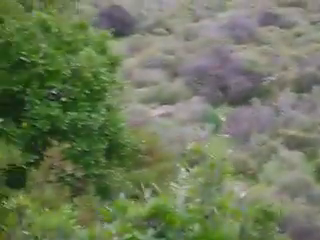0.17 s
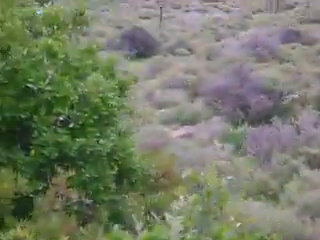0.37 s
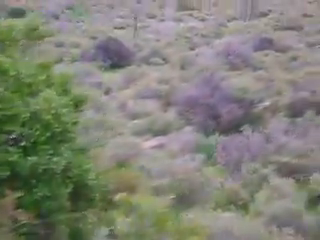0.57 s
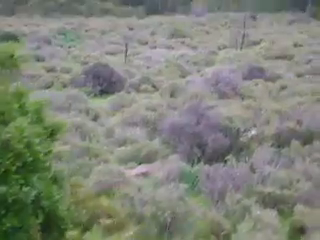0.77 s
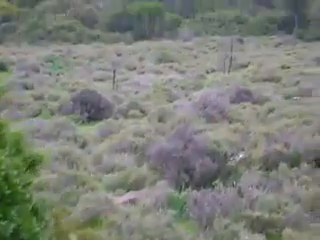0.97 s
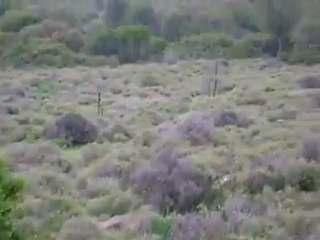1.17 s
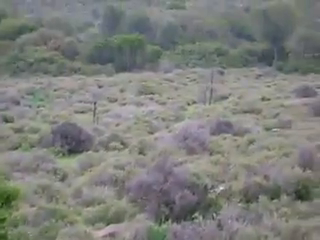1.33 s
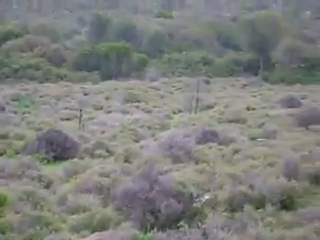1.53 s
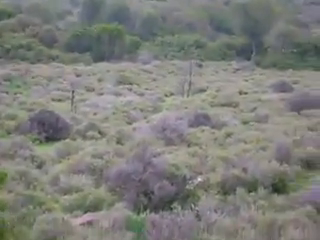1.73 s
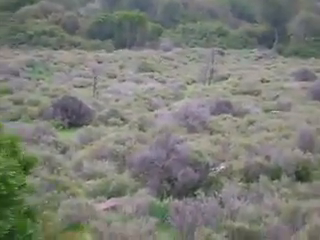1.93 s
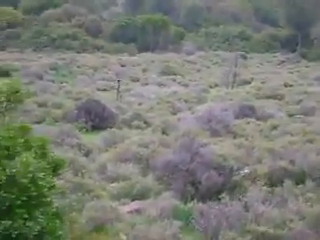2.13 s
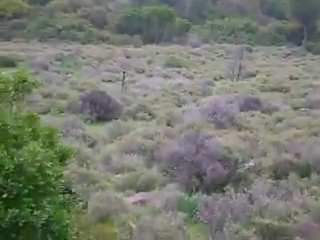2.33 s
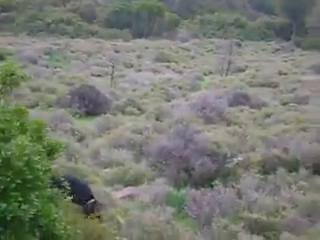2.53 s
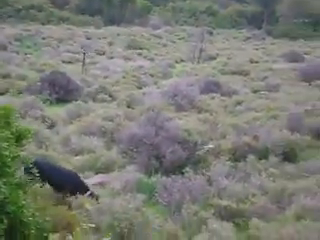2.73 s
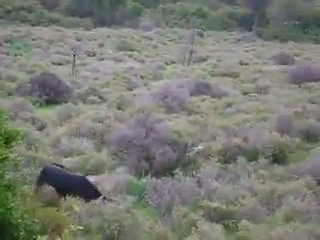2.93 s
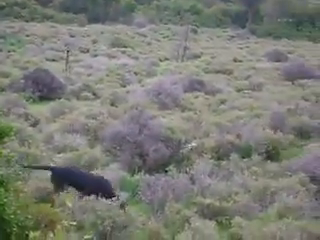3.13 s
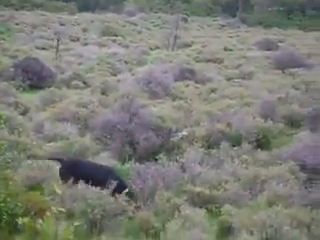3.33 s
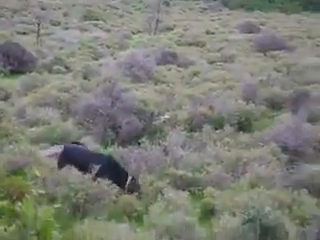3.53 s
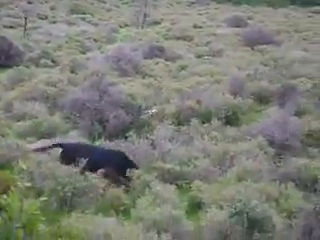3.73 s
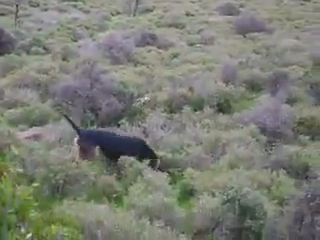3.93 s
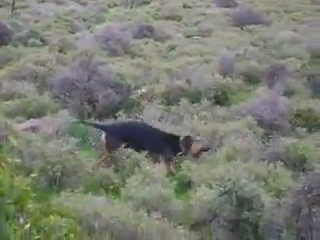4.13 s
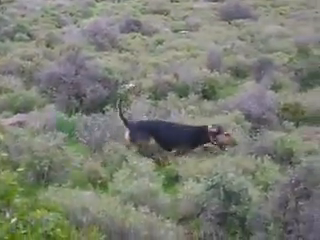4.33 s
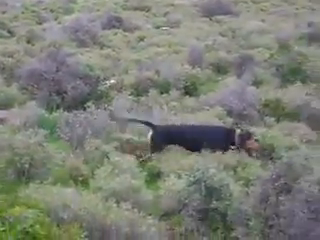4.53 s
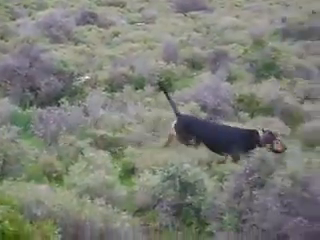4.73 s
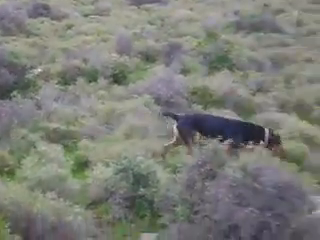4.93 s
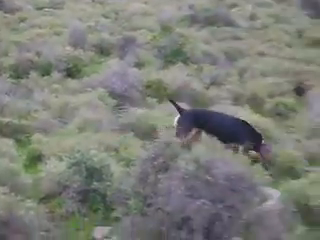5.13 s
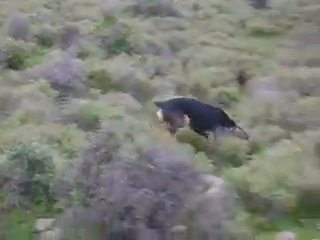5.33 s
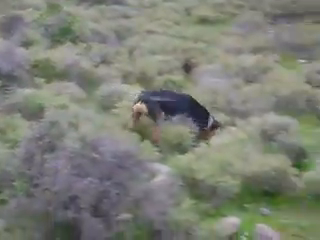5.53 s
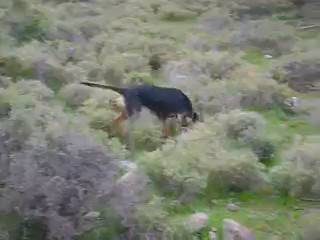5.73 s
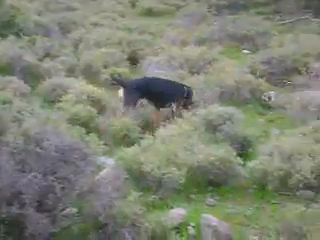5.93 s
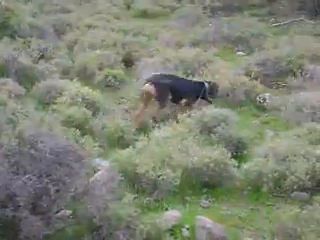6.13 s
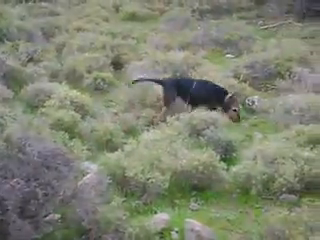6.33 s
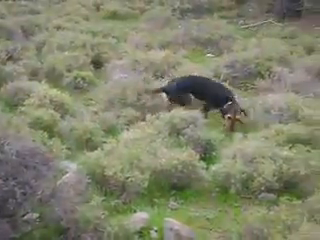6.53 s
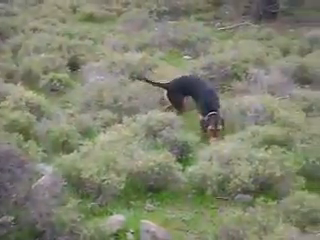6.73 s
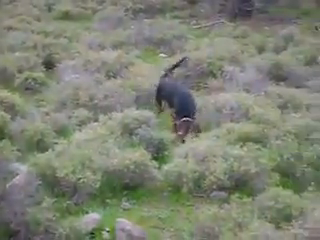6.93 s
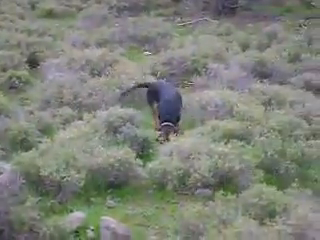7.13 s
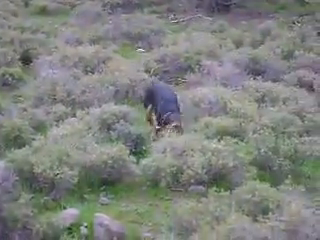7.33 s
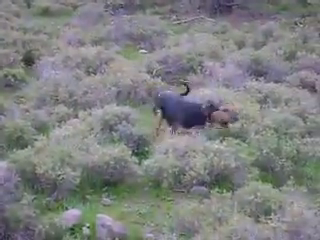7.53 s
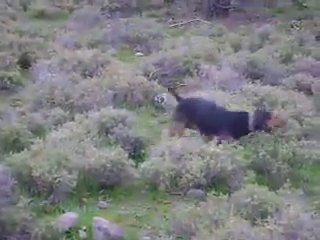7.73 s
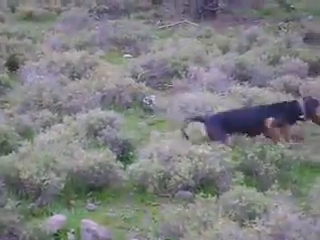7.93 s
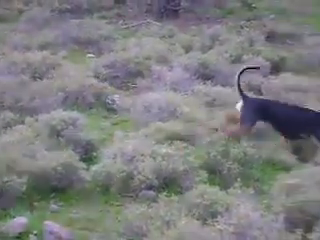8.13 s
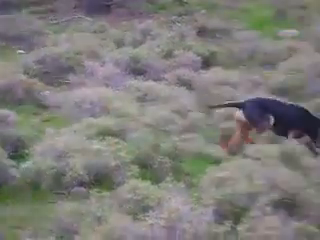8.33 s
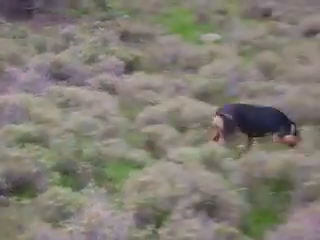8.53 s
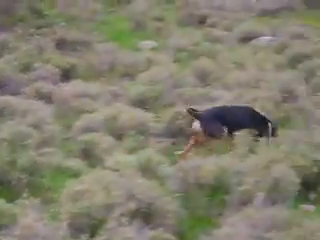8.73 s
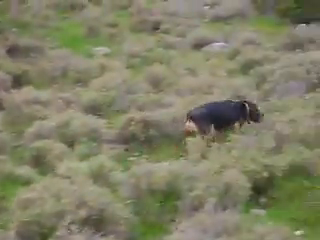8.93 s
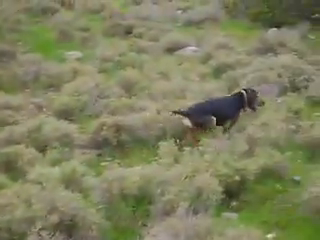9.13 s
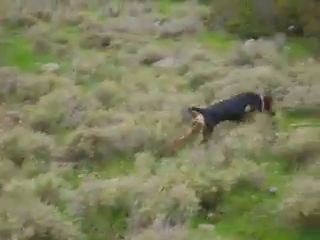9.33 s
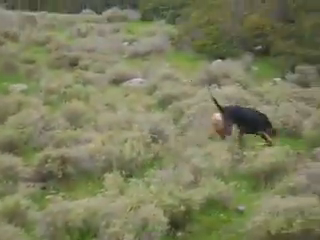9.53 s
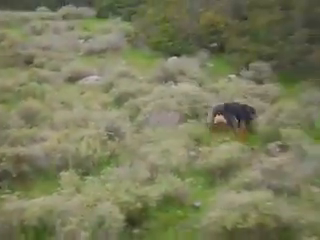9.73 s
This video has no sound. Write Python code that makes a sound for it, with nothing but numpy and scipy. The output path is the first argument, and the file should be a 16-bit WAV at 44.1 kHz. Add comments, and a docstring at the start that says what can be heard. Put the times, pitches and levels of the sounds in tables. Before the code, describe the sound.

Clipped yelping barks echo faintly over an open slope, between pauses filled with collar-bell clinks, rustling scrub, snapping twigs and soft hiss.

```python
"""Hound on a scrubby hillside

Ten short barks overload the microphone input, with soft grunts between: harmonics and rasp through a throat.
A small collar bell clanks in ringing modes, twigs snap as damped bursts, brush rustles as grainy noise.
The calls leave a hollow ring and a faint slope echo; gusts rumble in low noise over an outdoor hiss.
"""
import sys
import numpy as np
from scipy import signal
from scipy.fft import rfft, irfft
from scipy.io import wavfile

SR = 44100
rng = np.random.default_rng(int(sys.argv[2]) if len(sys.argv) > 2 else 0)


def persist_wave(psi):
    """Save psi, clipped to +-1, as 16-bit WAV."""
    counts = np.round(np.clip(psi, -1, 1) * 32767).astype(np.int16)
    wavfile.write(sys.argv[1], SR, np.atleast_2d(counts).T)


N = 431718  # samples


def amp(db):
    """Decibels to gain."""
    return 10 ** (np.asarray(db) / 20)


def unit(x):
    """Scales to rms 1."""
    return x / np.sqrt(np.mean(x ** 2) + 1e-20)


def read(points, hz):
    """Reads a (Hz, value) curve on a log-frequency axis."""
    f, value = np.transpose(points)
    return np.interp(np.log(hz + 1), np.log(f + 1), value)


def add(mix, s, sound):
    """Adds a sound into the mix at time s."""
    part = mix[max(round(s * SR), 0):][:len(sound)]
    part += sound[:len(part)]


def colour(x, db_at):
    """Filters x by a gain in dB given as a function of frequency."""
    hz = np.fft.rfftfreq(len(x), 1 / SR)
    return irfft(rfft(x) * amp(db_at(hz)), len(x))


def noise(size, db_at):
    """Coloured noise of rms 1."""
    return unit(colour(rng.standard_normal(N)[:size], db_at))


def waver(size, hz):
    """Smooth random drift of rms 1, rolled off steeply above hz."""
    return noise(size, lambda f: -20 * np.log10(1 + (f / hz) ** 4))


def hound(turbulence_db=-17.0):
    """All the barks and grunts; forced air roughens the barks, the soft grunts are duller."""
    # barks: start_s, (attack_s, to_voice_break_s, to_crest_s, length_s),
    # (pitch_hz in the chest voice, after the break, held, at the crest, at the end),
    # bend of the final fall (1 = straight, more = late), (effort_db held, at the end),
    # (mouth_opening_db at the break, held, at the crest), roughness (0-1)
    barks = [ (.624, (0.028, 0.0044, 0.059, 0.1), (324.8, 600.7, 723.4, 800, 613), 1.62, (4.1, -2.9),
             (6.2, 1, 5), 0.16), (.986, (.017, .017, .094, .117), (438.2, 708.6, 661.4, 699.4, 631),
             2.4, (9.3, -2.5), (2.2, 0.94, 0), 0.36), (4.193, (.021, 0.018, .081, 0.11),
             (440, 699.5, 674, 783.3, 592), 1.1, (10, 4.9), (16.1, -11.5, 20), 0.34),
             (4.718, (.013, .021, .081, .115), (514.7, 744, 679, 777.5, 609.3), 0.62, (6.2, 1),
             (18, 0.62, 15), 0.63), (6.245, (.013, .019, .086, .109), (483.2, 724.6, 683, 724, 614.5),
             1.56, (8.4, 1.5), (9.4, -0.5, -3.5), 0.23), (7.507, (.01, .013, .078, .112),
             (440.3, 675.3, 653.4, 765.3, 601), 1.76, (12.4, 0), (13.6, -2, 40), 0.46),
             (7.877, (.014, .012, .078, .113), (408, 633.3, 670, 687.6, 489.5), 2.13, (11.2, 0.9),
             (25, 27, 20.3), 0.55), (8.234, (.012, .014, .081, .116), (407.5, 662.7, 726.7, 763, 646.5),
             1.18, (10.3, 0), (3.2, -4, 13.6), 0.32), (8.945, (.008, .012, .082, .116),
             (428.4, 700.4, 656.6, 792.4, 585), 2.194, (6.2, 2), (4, -7, 15), 0.47),
             (9.348, (.027, 0.0028, .055, .098), (487, 540, 651, 706.4, 572.2), 0.379, (3.7, 6.4),
             (32, 25, 6.8), 0.3)]
    # grunts and whines: peak_s, rise_s, fall_s, pitch_hz, effort_db, mouth_opening_db,
    # roughness (held within 0-1)
    grunts = [(3.958, 0.037, 0.05, 692, -41, -15, 0.3), (4.547, 0.019, 0.019, 405.5, -10, 16, 0),
              (5.982, 0.012, 0.043, 318.5, -25.5, -8.5, 1.07), (6.382, 0.013, .016, 639, -5, -1, 0.2),
              (7.366, 0.01, 0.015, 337.3, -9.5, -1, 0.31), (8.82, 0.017, 0.015, 300.4, -20, -10, 0.6),
              (9.096, 0.0093, 0.013, 667, -7.5, -9, 0)]
    # turbulence at the vocal folds: frequency_hz, relative_level_db
    turbulence = [(300, -16.5), (700, 1.5), (1200, 21), (2000, 6), (2800, -10), (4200, -42.5), (6000, -35)]
    out = np.zeros(N)
    for s, *shape in barks:
        lead, call = voice(*bark_gesture(*shape), fundamental_db=-3., jitter=0.037,
                           half_lines=0.42, rasp=.55, shimmer=0.77)
        # the flow turns turbulent at each opening of the folds
        rush = noise(len(call), lambda f: read(turbulence, f)) * abs(call)
        add(out, s + lead, call + amp(turbulence_db) * rush)
    for s, *shape in grunts:
        lead, call = voice(*grunt_gesture(*shape), fundamental_db=21.5, jitter=0.04,
                           half_lines=0.17, rasp=0.6, shimmer=1.0)
        dull_call = colour(call, lambda f: read([(1100, -1), (1900, -15.5), (4000, -4.0)], f))
        add(out, s + lead, dull_call)
    return out


def bark_gesture(times, pitches, bend, efforts, mouths, rough):
    """A bark climbs in the chest voice, breaks upward, holds, rises to a crest and falls away."""
    break_s, crest_rise_s, release_s = 0.00487, 0.0201, .016
    onset_pitch, release_pitch = .68, .9  # pitch ratios
    chest_climb_per_s = 5.964  # relative climb
    onset_db, chest_db, release_db = -44, -0.5, -37  # effort outside the high register
    break_effort_db, crest_effort_db = -1, -3.5  # relative to the held effort
    # opening, as dB on the upper throat resonance
    mouth_onset_db, mouth_chest_db, mouth_end_db = 19, -16.5, -7
    rough_onset, rough_chest, rough_end = 0.53, 0.031, 0.57
    rough_held, rough_crest = 1, 1.46  # times the roughness of the bark
    mouth_sag = 0.085  # share by which that resonance sinks as the jaw closes after the crest

    attack, to_break, to_crest, length = times
    chest_hz, break_hz, held_hz, crest_hz, end_hz = pitches
    db, end_db = efforts
    mouth_break, mouth_held, mouth_crest = mouths
    start_hz = chest_hz * np.exp(-chest_climb_per_s * to_break)
    stages = [  # time_s, pitch_hz, effort_db, mouth_opening_db, roughness
        (-attack, start_hz * onset_pitch, onset_db, mouth_onset_db, rough_onset),
        (0, start_hz, chest_db, mouth_chest_db, rough_chest),
        (to_break, chest_hz, chest_db, mouth_chest_db, rough_chest),
        (to_break + break_s, break_hz, db + break_effort_db, mouth_break, rough),
        (to_crest - crest_rise_s, held_hz, db, mouth_held, rough * rough_held),
        (to_crest, crest_hz, db + crest_effort_db, mouth_crest, rough * rough_crest),
        (length, end_hz, end_db, max(mouth_end_db, mouth_held / 2), rough_end),
        (length + release_s, end_hz * release_pitch, release_db, mouth_end_db, rough_end)]
    s, *columns = np.transpose(stages)
    t = np.arange(s[0], s[-1], 1 / SR)
    hz, effort_db, mouth_db, roughness = (np.interp(t, s, c) for c in columns)
    fall = np.clip((t - to_crest) / (length - to_crest), 0, 1)
    bent_hz = hz + (crest_hz - end_hz) * (fall - fall ** bend)
    return t, bent_hz, effort_db, mouth_db, roughness, mouth_sag * np.sqrt(fall)


def grunt_gesture(rise, fall, hz, db, mouth_db, rough):
    """A grunt is one small arch of pitch and effort."""
    fade_db, arch = -23, 0.091  # level change and share of pitch lost at either end
    t = np.arange(-rise, fall, 1 / SR)
    away = np.maximum(-t / rise, t / fall)  # 0 at the peak, 1 at either end
    return t, hz * (1 - arch * away ** 2), db + fade_db * away ** 1.16, mouth_db, rough, 0


def mouth_shape(hz):
    """The upper throat resonance, 1 at its centre."""
    centre_hz, spread_hz = 1424, 214
    return np.exp(-.5 * ((hz - centre_hz) / spread_hz) ** 2)


def voice(t, hz, effort_db, mouth_db, rough, sag, fundamental_db, jitter, half_lines, rasp, shimmer):
    """One call from its pitch, effort and mouth opening; rough folds add half lines, jitter and rasp."""
    # throat response: frequency_hz, relative_level_db
    throat = [(150, -53), (420, -22.5), (570, -3), (720, 9), (880, -3.5), (1100, -1), (1400, -9.5),
              (1800, -14), (2400, -33.5), (3200, -45), (4200, -18), (6000, -88)]
    rough, size = np.clip(rough, 0, 1), len(t)
    turns = np.cumsum(hz * (1 + jitter * rough * waver(size, 194))) / SR
    folds, power = np.zeros(size), np.zeros(size)
    for half in range(1, 25):  # in steps of half the pitch
        f = hz * half / 2
        mouth_gain_db = mouth_db * mouth_shape(f / (1 - sag))
        gain = amp(read(throat, f) + mouth_gain_db + fundamental_db * (half == 2))
        if half % 2:  # alternate strong and weak pulses
            gain = gain * half_lines * rough
        flutter = 1 + shimmer * rough * waver(size, 98)
        folds += gain * flutter * np.cos(np.pi * half * turns + 2 * np.pi * rng.random())
        power += gain ** 2 / 2
    # rasp passes the same throat and brightens as the mouth opens
    shut = noise(size, lambda f: read(throat, f))
    wide = noise(size, lambda f: read(throat, f) + 9 * mouth_shape(f))
    opening = np.clip(0.58 + mouth_db / 20, 0, 1)
    breath = np.sqrt(1 - opening) * shut + np.sqrt(opening) * wide
    call = amp(effort_db) * (folds / np.sqrt(power) + rasp * rough * breath)
    return t[0], call * signal.windows.tukey(size, .04)


def bell(ring_db=6.0, tick_db=-14.5, tick_s=0.0023, rattle_db=-9., rattle_s=0.035):
    """Each strike favours another family of the collar bell's modes; the clapper rebounds once."""
    # hard clapper strikes, relative levels:
    # start_s, tick_db, low_modes_db, middle_modes_db, top_modes_db
    strikes = [(0.9572, -34, -61, -60, -26), (1.3648, -12.5, -47, -48, -46.5), (1.7355, -11, -32, -46, -37),
               (1.871, -26, -44, -51, -52), (1.9604, -19, -46, -57, -55), (2.1002, -19, -49, -49, -61),
               (2.388, -8, -24.5, -58, -49), (2.7477, -19, -62, -47.5, -49), (2.84, -9, -45, -54, -41),
               (2.865, -9, -43, -53, -68), (2.9367, -26, -49, -50.5, -56), (3.081, -38, -66, -54, -71),
               (3.21, -50, -64, -48.5, -56), (3.7176, -52, -40.5, -64, -60), (4.4388, -17, -37.5, -64, -45),
               (4.508, -16, -30.5, -54, -48), (5.033, -9.5, -38.5, -60, -59), (5.269, 3.5, -49, -39, -37),
               (5.3297, -19, -42, -70, -50), (5.466, -9.5, -38, -39.5, -50), (5.5836, -50, -44, -43, -53),
               (5.6406, -14, -35, -52, -47.5), (5.7662, -3, -29, -37, -39),
               (5.8128, -29, -39, -40.5, -38.5), (6.075, -27, -45, -45.5, -71),
               (6.571, -19, -40.5, -68, -70), (6.6902, -16, -43, -52, -62), (6.761, -15, -54, -49, -40),
               (6.8445, -17, -40, -49, -54), (6.8809, -11, -37, -50, -64), (6.9496, -11.5, -38, -68, -55),
               (7.1072, -18, -44, -45.5, -60), (7.4065, -20, -48, -48.5, -55), (7.665, -7, -32, -34.5, -47),
               (8.0558, -17, -33, -59, -66), (8.5123, -10, -35.5, -61, -57), (8.697, -32, -42, -56, -61),
               (8.885, -21, -40, -48.5, -52), (9.6087, -16, -39.5, -58, -48.5)]
    # low, middle and top families of modes: mean_frequency_hz, relative_level_db, t60_s
    mode_families = [
        [(2030, -8, 0.18), (2046, -6, 0.17), (4000, -26.5, 0.16)],
        [(2568, 4.5, 0.34), (4160, -19.5, 1)],
        [(5400, -0.5, 0.13), (5520, -8.5, 0.16), (5580, -1.5, 0.14), (4870, -14.5, 0.4)],
    ]
    out, t = np.zeros(N), np.arange(SR // 2) / SR
    tick_curve = [(500, -23), (2000, -7.0), (4500, 6.0), (5700, -9.5), (6800, -33.5)]
    for s, hit_db, *family_db in strikes + light_taps():
        tick = noise(len(t), lambda f: read(tick_curve, f))
        clank = amp(hit_db + tick_db) * tick * np.exp(-t / tick_s)
        for level_db, family in zip(family_db, mode_families):
            for hz, db, t60 in family:
                detuned_hz = hz + 3 * rng.standard_normal()
                decay = amp(ring_db + level_db + db - 60 * t / t60)
                clank += decay * np.sin(2 * np.pi * detuned_hz * t)
        clank *= 1 - np.exp(-t / 0.001)  # soften the onset
        add(out, s, clank)
        add(out, s + rattle_s * rng.uniform(0.69, 1.9), amp(rattle_db) * clank)
    return out


def light_taps(count=22, every_s=.45, spread_db=7):
    """The trot keeps the clapper tapping lightly, uneven in time and strength."""
    # average tap, relative levels: tick_db, low_modes_db, middle_modes_db, top_modes_db
    average_tap = (-42, -52, -64, -75)
    taps = []
    for k, (late, *louder) in enumerate(rng.standard_normal((count, 5))):
        levels_db = average_tap + spread_db * np.array(louder)
        taps.append(((k + .2 * late) * every_s, *levels_db))
    return taps


def twigs(snap_db=-4.5, crack_s=0.0004, delay_s=0.000875, splinter_db=-35.0, splinter_s=0.0072,
          knock_db=-19.5, knock_hz=1030, knock_s=0.0048):
    """Each snap is a brief damped crack with splintery noise and a knock."""
    # snapping twigs: start_s (before the short delay), relative_level_db, ring_hz
    snaps = [(1.913, -2, 1000), (2.386, -11, 2300), (4.13, 0, 2040), (4.565, -2, 1750),
             (5.198, -11.5, 1710), (5.268, -35, 2510), (6.139, -0.5, 1830), (6.153, -12, 2030),
             (9.686, -12.5, 1450)]
    out, t = np.zeros(N), np.arange(SR // 20) / SR
    splinter_curve = [(500, 25), (1100, -26), (2000, 24.0), (4000, -1.0)]
    for s, db, hz in snaps:
        crack = t / crack_s * np.exp(1 - 2 * t / crack_s) * np.sin(2 * np.pi * hz * t)
        grit = noise(len(t), lambda f: read(splinter_curve, f))
        splinters = amp(splinter_db) * grit * np.exp(-t / splinter_s)
        knock = amp(knock_db) * np.exp(-t / knock_s) * np.sin(2 * np.pi * knock_hz * t)
        add(out, s + delay_s, amp(db + snap_db) * (crack + splinters + knock))
    return colour(out, lambda f: read([(400, -14), (900, 3.5), (3600, 12), (5000, 12), (7000, -6)], f))


def brush(grain_db=4.5):
    """Dry scrub sweeping past the legs: short swishes of noise with a grainy level."""
    # rustles: middle_s, level_db before the fade, half_length_s, centre_hz
    rustles = [(0.188, -41, 0.011, 830), (0.393, -40.5, 0.042, 980), (0.543, -41, 0.014, 1240),
               (1.371, -44, 0.06, 2910), (1.565, -42.5, 0.042, 2780), (1.755, -35.5, 0.044, 3800),
               (2.085, -47.5, 0.11, 1140), (2.418, -37.5, 0.014, 990), (2.581, -36, .015, 2820),
               (3.49, -39.5, 0.027, 4450), (5.249, -33.5, 0.022, 4470), (5.805, -32, 0.038, 3380),
               (6.816, -40, 0.045, 1260), (7.026, -36.5, 0.022, 730), (9.286, -34.5, 0.012, 4360)]
    out = np.zeros(N)
    for s, db, half_length, hz in rustles:
        size = int(2 * half_length * SR)
        swish = noise(size, lambda f: -7 * np.log2((f + 1) / hz) ** 2
                      - 20 * np.log10(1 + (f / 5600) ** 16))
        grainy = unit(swish * amp(grain_db * waver(size, 165)))
        add(out, s - half_length, amp(db) * grainy * np.hanning(size))
    return out


def hollow(x, ring_db=-29.0, ring_t60=0.23):
    """Clusters of close resonances beat and die away after each call."""
    # resonance clusters: centre_hz, width_hz, relative_level_db
    clusters = [(718, 150, -6.5), (1188, 180, -7.5), (1860, 12, -24), (2490, 200, -1.5)]
    t = np.arange(SR // 2) / SR

    def cluster_db(f):
        return 10 * np.log10(sum(amp(2 * db) / (1 + (2 * (f - hz) / width) ** 4)
                                 for hz, width, db in clusters))

    ring = noise(len(t), cluster_db) * amp(-60 * t / ring_t60) * np.minimum(t / 0.0048, 1)
    return signal.fftconvolve(x, amp(ring_db) * ring / np.linalg.norm(ring))[:N]


def slope(x, near_db=-18.0, near_t60=0.17, far_db=-33.0):
    """Quick scatter from the ground and bushes, with a faint, longer echo from the hillside."""
    # hillside echo decay: frequency_hz, t60_s
    hillside_decay = [(200, 0.79), (700, 0.63), (1500, 0.99), (4000, 0.27), (8000, 0.89)]
    hz, t, z = signal.stft(rng.standard_normal(SR), SR, nperseg=256)
    decayed = z * amp(-60 * t / read(hillside_decay, hz)[:, None])
    far = signal.istft(decayed, SR, nperseg=256)[1][:SR]
    t = np.arange(SR) / SR
    near = rng.standard_normal(SR) * amp(-60 * t / near_t60) * (t > .004)
    near_response = amp(near_db) * near / np.linalg.norm(near)
    far_response = amp(far_db) * far / np.linalg.norm(far)
    echo = signal.fftconvolve(x, near_response + far_response)[:N]
    # the echo is strongest at the bottom and above 2 kHz, thin around 1.4 kHz
    return colour(echo, lambda f: read([(300, 8.5), (680, -1.0), (1150, -7.0), (1450, -12.5),
                                        (2300, 7), (4200, 4)], f))


def wind(gust_db=9.5, lumps_db=4.5):
    """Gusts on the microphone: lumpy low buffeting that dulls as the gust eases."""
    # gusts: peak_s, relative_level_db, rise_time_constant_s, fall_time_constant_s
    gusts = [(5.332, -41.5, 0.01, 0.055), (5.653, -28.5, 0.023, 0.08), (5.9, -36, 0.051, 0.068),
             (6.114, -44, 0.081, 0.18), (7.026, -48.5, 0.053, 0.05), (7.306, -48.5, 0.14, 0.084),
             (9.78, -46, 0.039, 0.12)]
    # buffeting spectrum: frequency_hz, relative_level_db (per Hz)
    spectrum = [(12, 6), (20, -6), (102, -1.5), (222, -8.5), (281, -11.5), (491, -20), (644, -31),
                (900, -23.5), (1170, -51), (1980, -120)]
    t = np.arange(N) / SR
    level = sum(amp(db) * np.exp(-np.maximum((s - t) / rise, (t - s) / fall))
                for s, db, rise, fall in gusts)
    strong = np.clip(level / amp(-32.5), 0, 1)
    bright = noise(N, lambda f: read(spectrum, f))
    dull = noise(N, lambda f: read(spectrum, f) - 10 * np.log10(1 + (f / 110) ** 2))
    buffeting = np.sqrt(strong) * bright + np.sqrt(1 - strong) * dull
    return amp(gust_db) * level * unit(buffeting * amp(lumps_db * waver(N, 21)))


def air(hiss_db=-46.5, swell_db=2.0, rumble_db=-59.0, drift_db=5.5):
    """Faint outdoor hiss that swells a little, over a drifting rumble of light wind."""
    # hiss spectrum: frequency_hz, relative_level_db (per Hz)
    spectrum = [(20, -2.5), (50, -11.5), (110, -7.5), (300, -5), (450, -4), (690, -1.5), (900, -4),
                (1700, -8.5), (3300, -11), (4000, -3), (4600, -7.5), (5500, -14), (6200, -22), (7300, -53)]
    hiss = amp(hiss_db + swell_db * waver(N, 7.8)) * noise(N, lambda f: read(spectrum, f))
    rumble = noise(N, lambda f: read([(10, -7), (35, -3.0), (80, -5), (200, -31.0), (600, -58)], f))
    return hiss + amp(rumble_db + drift_db * waver(N, 1.9)) * rumble


def scene(snap_echo_db=-26.0):
    """The dog and what it disturbs, with echoes of calls and snaps, over wind and hiss."""
    dog, snaps = hound(), twigs()
    echoes = hollow(dog) + slope(dog + amp(snap_echo_db) * snaps)
    return (dog + snaps + echoes + bell() + brush() + wind() + air())[None]


def record(dry):
    """A dull microphone feeds an input that flattens loud peaks; then treble response and band limit."""
    # microphone response ahead of the overload: frequency_hz, gain_db
    microphone = [(5400, -0.5), (6200, 4), (7000, -10), (8000, -40)]
    # treble response after the overload: frequency_hz, gain_db
    treble = [(3000, -1), (5000, -3), (6900, -9.5), (7150, -6), (7400, -9), (9300, -7.5), (9750, -2),
              (10050, -10.5), (10800, -16), (12000, -29.5)]
    ceiling, edge_hz = .72, 12400  # ceiling relative to full scale
    # overload at twice the sample rate
    fine = signal.resample_poly(colour(dry[0], lambda f: read(microphone, f)), 2, 1)
    flattened = signal.resample_poly(np.clip(fine, -ceiling, ceiling), 1, 2)
    toned = colour(flattened, lambda f: read(treble, f))
    band_limit = signal.firwin(511, edge_hz, window=("kaiser", 9), fs=SR)
    return signal.oaconvolve(toned, band_limit, "same")[None]


dry = scene()
out = record(dry)
persist_wave(out)
```